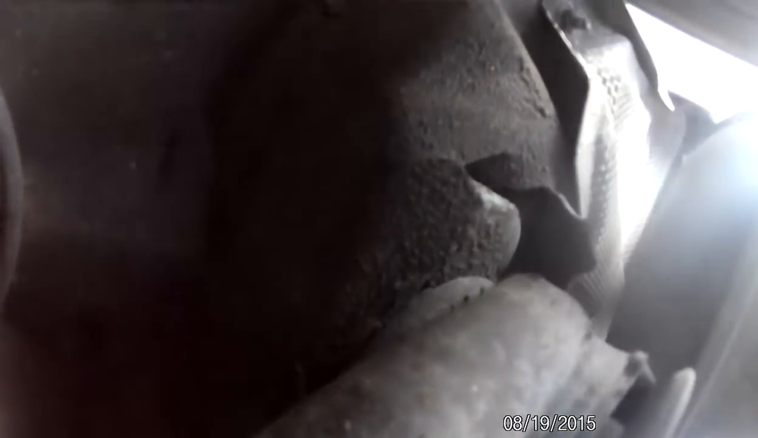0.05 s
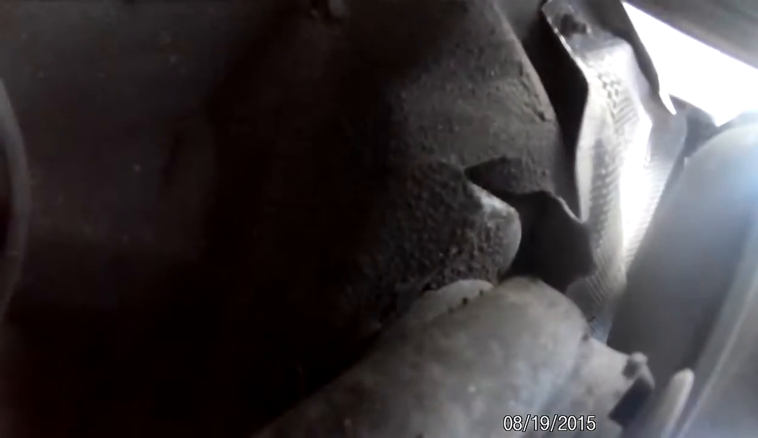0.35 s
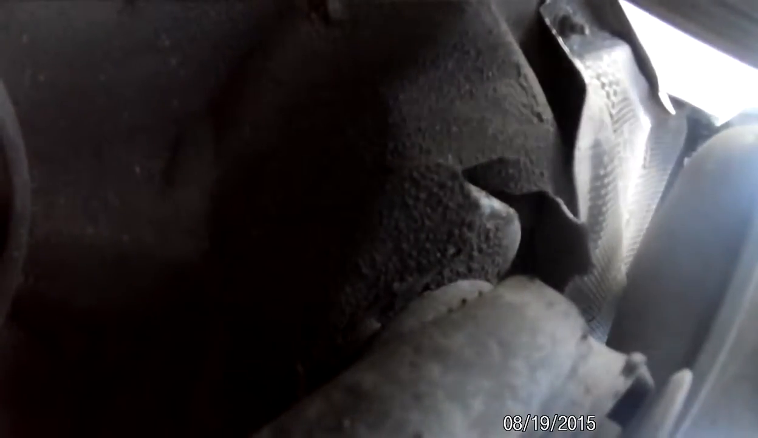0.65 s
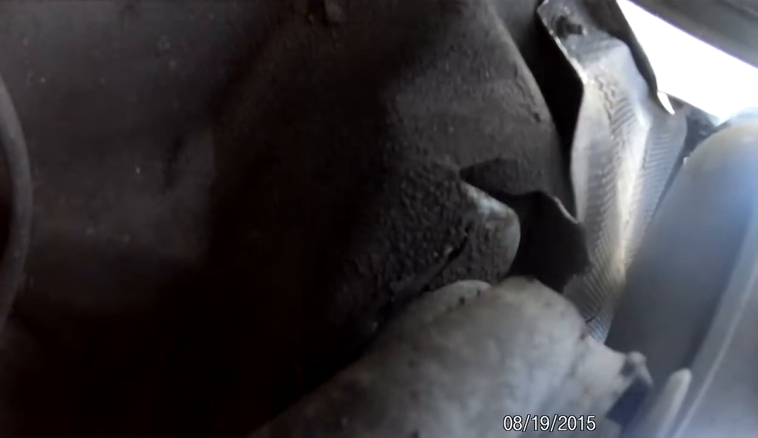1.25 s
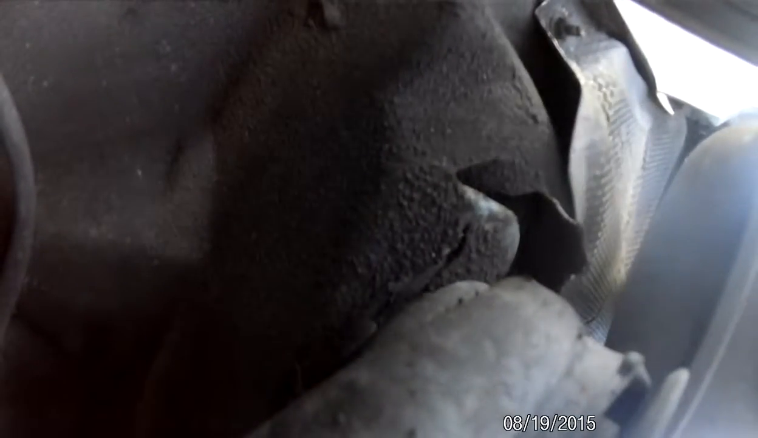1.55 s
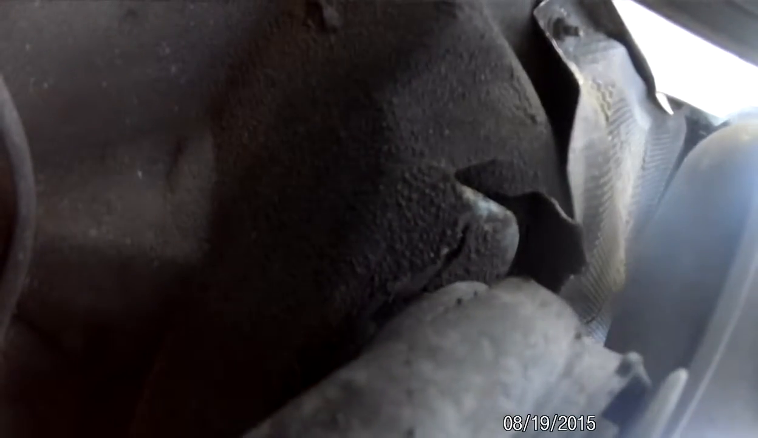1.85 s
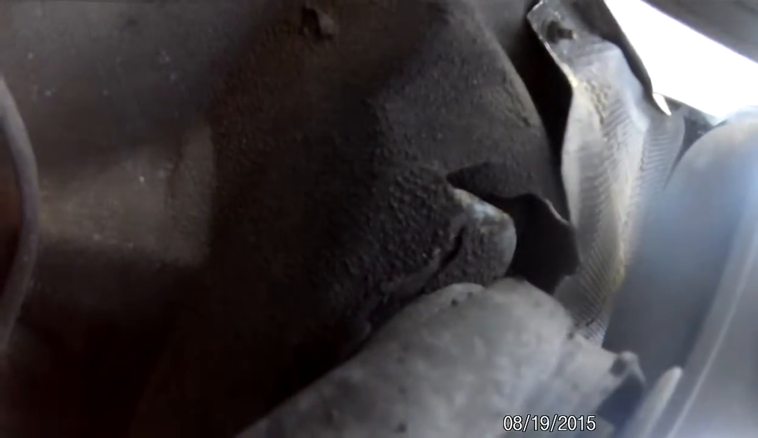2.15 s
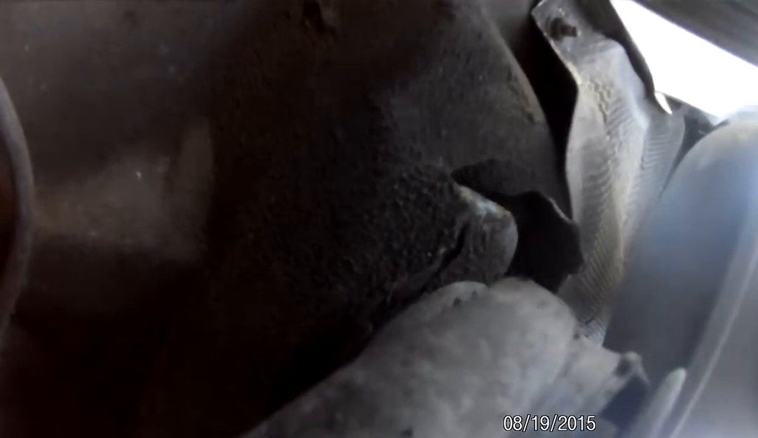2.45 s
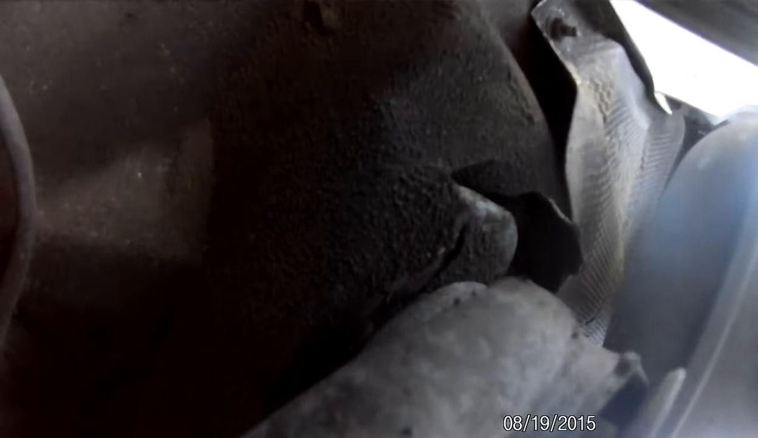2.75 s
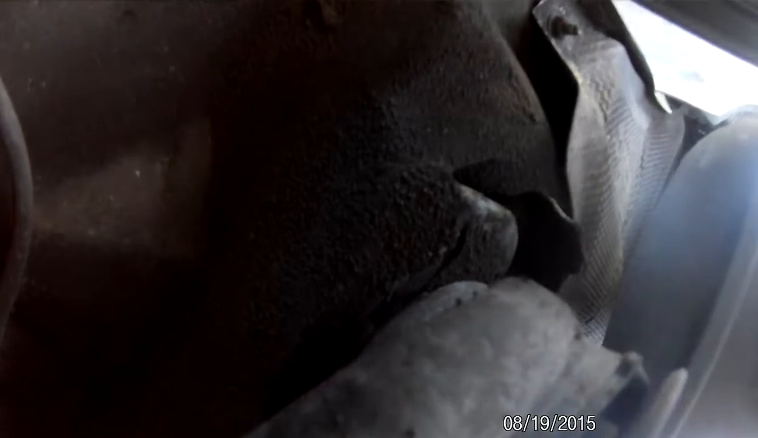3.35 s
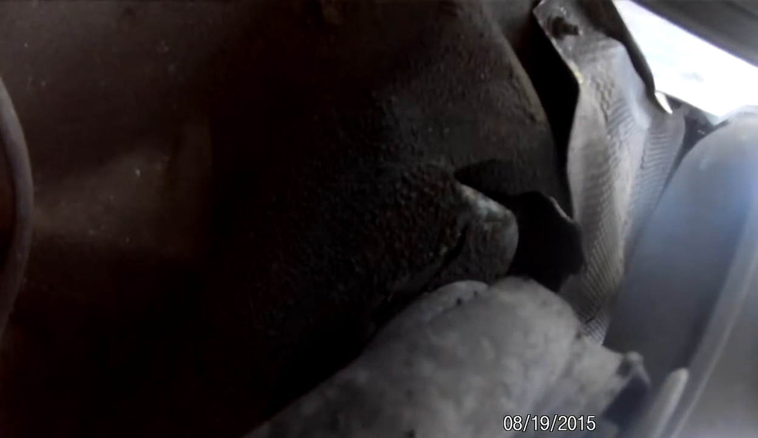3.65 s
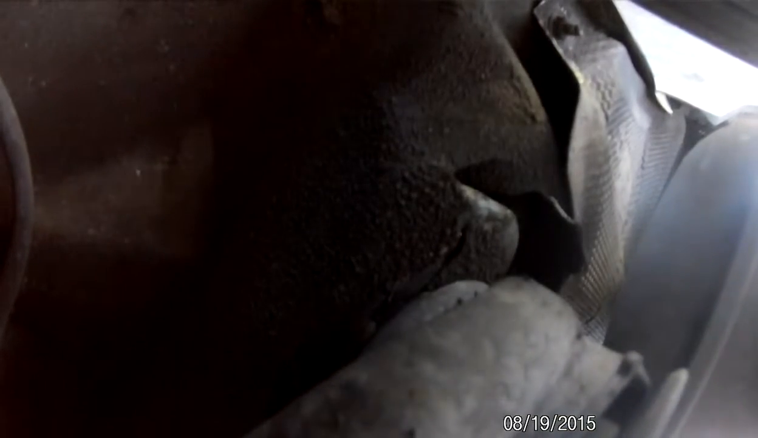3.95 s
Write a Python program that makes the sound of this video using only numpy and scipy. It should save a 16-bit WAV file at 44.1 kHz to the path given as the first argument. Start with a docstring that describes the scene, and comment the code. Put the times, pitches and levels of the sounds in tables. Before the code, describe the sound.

A car's suspension creaks, heard close up from underneath as it rolls slowly. After a brief hiss come short rubbery groans, then dry snaps that quicken into a rasp, then scattered knocks, all over a low engine and road rumble.

```python
"""A bright hiss, cut off abruptly, opens on a close microphone under a slowly moving car.
A dry suspension joint sticks and slips, creaking in single snaps that run together into a rasp.
A second, rubbery joint slips in short groans and knocks that ring the underbody.
Behind them the engine drones, the body booms with the road and a thin hum wavers."""
import sys
import numpy as np
from scipy import signal
from scipy.fft import rfft, irfft, next_fast_len
from scipy.io import wavfile
from scipy.ndimage import map_coordinates

SR = 44100
rng = np.random.default_rng(int(sys.argv[2]) if len(sys.argv) > 2 else 0)


def master(y):
    """Save y as 16-bit WAV."""
    cut = np.clip(np.atleast_2d(y).T, -1, 1)
    pcm = np.round(cut * 32767)  # scale
    wavfile.write(sys.argv[1], SR, pcm.astype(np.int16))


N = 176400


def amp(db):
    """Decibels to gain."""
    return 10 ** (np.asarray(db) / 20)


def unit(x):
    """Scale to rms 1."""
    return x / np.sqrt(np.mean(x ** 2) + 1e-20)


def along(points, hz):
    """Read (Hz, value) points on a log frequency axis."""
    knots_hz, values = np.transpose(points)
    return np.interp(np.log(hz + 1), np.log(knots_hz + 1), values)


def curve(rows):
    """Join (seconds, value) points, one value per sample."""
    return np.interp(np.arange(N) / SR, *np.transpose(rows))


def wobble(rate):
    """A smooth random curve, rate knots a second."""
    return map_coordinates(rng.standard_normal(4096), [np.arange(N) * rate / SR], mode="wrap")


def coloured(x, points):
    """Pass x through a causal filter with the given (Hz, dB) shape."""
    size = 2 * next_fast_len(len(x) // 2 + 4096)
    gain = amp(along(points, np.fft.rfftfreq(size, 1 / SR)))
    cepstrum = irfft(np.log(gain), size)
    cepstrum[1:size // 2] *= 2  # fold to minimum phase
    cepstrum[size // 2 + 1:] = 0
    return irfft(rfft(x, size) * np.exp(rfft(cepstrum)), size)[:len(x)]


def noise(points):
    """Coloured noise of rms 1."""
    return unit(coloured(rng.standard_normal(N), points))


def add(track, start_s, sound):
    """Mix a sound into the track."""
    i = max(round(start_s * SR), 0)
    track[i:i + len(sound)] += sound[:max(N - i, 0)]


# The hiss at the microphone. Each row: frequency in Hz, relative noise density in dB.
HISS_COLOUR = [(900, -7.5), (1500, -1), (1900, -10), (2450, -9), (3200, -24.5), (4300, -2), (5500, -25.5),
               (6500, -19.5), (7900, -39), (9600, -25), (11500, -47)]

def hiss(level_db=-34, end_s=0.2254, fade_s=0.028):
    """A bright hiss that stops abruptly."""
    gate = np.clip((end_s - np.arange(N) / SR) / fade_s, 0, 1)
    return amp(level_db) * gate ** 2 * noise(HISS_COLOUR)


# The crank's speed. Each row: time in seconds, turns per second.
CRANK_SPEED = [(0, 26.0), (1.4, 29.2), (2.5, 30.2), (2.8, 31.3), (3.15, 30.9), (3.62, 27.7), (3.9, 23.5),
               (4, 23.2)]
# The exhaust's resonances. Each row: frequency in Hz, gain in dB.
EXHAUST_RESPONSE = [(26, -13.5), (54, -4.5), (82, 0.5), (110, -35.5), (190, -27.5), (218, 9), (245, 2.5),
                    (275, -30.5), (310, 6), (350, -9.5), (400, -31)]
# The drone from under the car. Each row: time in seconds, relative level in dB.
DRONE_LEVEL = [(.7, -36), (1.3, -39), (2.1, -32.5), (2.7, -46), (3.1, -37), (3.55, -40.5), (3.8, -59.5)]
# The twelfth order, standing out as the engine slows. Each row: time in seconds, level in dB.
WHINE_LEVEL = [(3.52, -48), (3.63, -34), (3.93, -43), (4, -32)]

def engine(drone_db=1.5):
    """Crank orders slide through fixed resonances, each a little unsteady."""
    speed = curve(CRANK_SPEED) * (1 + 0.0023 * wobble(6.8))
    angle = 2 * np.pi * np.cumsum(speed) / SR
    orders = np.zeros(N)
    for order in range(1, 19):
        gain = amp(along(EXHAUST_RESPONSE, order * speed) + 3.5 * wobble(5.1))
        phase = 2 * np.pi * rng.random() + 0.17 * wobble(15)
        orders += gain * np.sin(order * angle + phase)
    whine = amp(curve(WHINE_LEVEL)) * np.sin(12 * angle)
    return amp(curve(DRONE_LEVEL) + drone_db) * unit(orders) + whine


# The body booming overhead. Each row: time in seconds, level in dB.
BOOM_LEVEL = [(.18, -49), (.33, -32), (1.09, -33.5), (1.25, -39.5), (1.7, -31.5), (1.92, -40),
              (2.08, -27.5), (2.3, -47), (2.5, -28.5), (2.68, -43.5), (3.2, -35.5), (3.43, -54),
              (3.84, -27), (4, -29)]
# Rolling noise, close to the road. Each row: frequency in Hz, relative noise density in dB.
ROLLING_COLOUR = [(30, -6), (45, 9), (90, -1), (170, -8), (235, 5.5), (320, 1.5), (400, -15), (700, -14.5),
                  (900, -21.5), (1250, -14.5), (1480, -15), (1750, -21), (2400, -21.5), (2900, -35.5),
                  (4300, -30.5), (5200, -47.5), (6400, -43), (7400, -54.5), (8200, -76)]
# The rolling eases near the end. Each row: time in seconds, level in dB.
ROLLING_LEVEL = [(0, -35), (3.3, -36.5), (3.7, -41)]

def road(boom_hz=52.06):
    """The body booms on one low resonance, under broad rolling noise; both levels waver."""
    resonance = np.sin(2 * np.pi * boom_hz * np.arange(N) / SR + 0.5 * wobble(5))
    rolling = amp(curve(ROLLING_LEVEL) + wobble(25.03)) * noise(ROLLING_COLOUR)
    boom = amp(curve(BOOM_LEVEL) + wobble(7.2)) * unit(resonance)
    return boom + rolling


# A faint hum in the background. Each row: time in seconds, level in dB.
HUM_LEVEL = [(.38, -53.5), (1.1, -55.5), (2.9, -58), (3.28, -51), (3.45, -60)]

def hum(centre_hz=1575, waver=0.012):
    """A thin tone wavers in pitch, smeared by a fast flutter."""
    hz = centre_hz * (1 + waver * wobble(9))
    tone = np.sin(2 * np.pi * np.cumsum(hz) / SR)
    return amp(curve(HUM_LEVEL)) * unit(wobble(70) * tone)


# The dry joint's modes. Each row: frequency in Hz, level in dB, seconds to fall 60 dB.
JOINT_MODES = [(224.6, -8.5, 0.1), (463, -14.5, 0.055), (644, 2.5, 0.017), (966, -5, .025),
               (1187, -0.5, 0.036), (1316, 2.5, 0.023), (1400, -5, 0.027), (1723, -16, 0.042),
               (2388, -18.5, 0.046), (2570, -28, 0.039), (3163, -31.5, 0.079)]

def joint_snap(attack_s=0.0014, scatter_db=1, detune=0.008):
    """One slip rings damped modes of alternating sign, a little different every time."""
    t = np.arange(SR // 6) / SR
    hz, db, t60 = np.transpose(JOINT_MODES)[:, :, None]
    pitch = 1 + detune * rng.standard_normal()
    sign = (-1) ** np.arange(len(hz))[:, None]
    gain = sign * amp(db + scatter_db * rng.standard_normal(hz.shape))
    modes = gain * amp(-60 * t / t60) * np.sin(2 * np.pi * hz * pitch * t)
    return modes.sum(0) * (1 - np.exp(-t / attack_s)) ** 2


# Single snaps close to the microphone. Each row: time in seconds, relative level in dB.
SINGLE_SNAPS = [(.0075, -18), (.0283, -19), (.0419, -16), (.0602, -20), (.0789, -17.5), (1.4373, -16),
                (1.4543, -14.5), (1.4712, -20.5), (1.4952, -13), (1.5311, -14), (1.5665, -16),
                (1.6049, -13), (1.6458, -11), (1.6962, -11), (1.7835, -10), (1.8613, -10.5),
                (1.8962, -16.5), (1.9262, -13), (2.1878, -12), (3.908, -23)]
# Dry grit in a snap. Each row: frequency in Hz, relative noise density in dB.
GRIT_COLOUR = [(200, 5), (1300, 0.5), (1900, -12.5), (2500, -17.5), (3000, -28), (4400, -20.5), (6500, -63)]

def creak(ring_db=-0.5, lead_s=0.001894, give_db=-10.5, give_s=0.00213, grit_db=-23, grit_t60_s=0.12):
    """The dry joint sticks and slips: each time it gives a little, snaps and trails grit."""
    slips = list(SINGLE_SNAPS) + rasp_slips()
    ringing, grit_power = np.zeros(N), np.zeros(N)
    age = np.arange(SR // 6) / SR
    grit = noise(GRIT_COLOUR)
    for at, db in slips:
        snap = amp(db + ring_db) * joint_snap()
        snap_at = at - lead_s  # the ring starts just ahead of the grit
        add(ringing, snap_at, snap)
        add(ringing, snap_at - give_s * rng.uniform(0.73, 1.343), amp(give_db) * snap)
        add(grit_power, at, amp(db + grit_db - 60 * age / grit_t60_s) ** 2)
    return ringing + np.sqrt(grit_power) * grit


# The underbody's panel modes, just above the microphone.
# Each row: frequency in Hz, lift over the direct sound in dB, seconds to fall 60 dB.
PANEL_MODES = [(461, 18, .17), (636, 2.5, 0.037), (855, -5.5, 0.056), (980, -1, 0.16), (1236, -2.5, 0.27),
               (1590, -7, 0.047)]

def underbody(t, tail_db=-1.5, tail_t60_s=0.12):
    """Answer to one slip: the direct push, panel modes and a diffuse tail off floor pan and road."""
    hz, lift_db, t60 = np.transpose(PANEL_MODES)[:, :, None]
    loss = np.log(1000) / t60
    modes = amp(lift_db) * 2 * loss / SR * np.exp(-loss * t) * np.cos(2 * np.pi * hz * t)
    tail = rng.standard_normal(len(t)) * amp(-60 * t / tail_t60_s)
    return (t == 0) + modes.sum(0) + amp(tail_db) * tail / np.linalg.norm(tail)


# The rubber joint at close range: fast slips squawk, slow ones knock.
# Each row: start in seconds, length in seconds, level in dB, opening slip rate in Hz.
RUBBER_GROANS = [(.266, .013, -20, 500), (0.2798, 0.025, -19, 399.7), (0.372, 0.019, -29, 412),
                 (0.627, 0.019, -26.5, 419), (2.233, .024, -37, 232), (2.277, 0.017, -22.5, 506),
                 (2.297, 0.0071, -20.5, 431.6), (2.3335, 0.03, -23, 484), (2.3489, .014, -19.5, 422.6),
                 (2.385, 0.02, -20.5, 211.7), (2.449, 0.031, -18, 216.6), (2.496, 0.01, -24.5, 212.8),
                 (2.8435, 0.0098, -27.5, 212), (2.904, 0.012, -23, 213), (3.4179, .018, -20.5, 216.4),
                 (3.506, 0.012, -38, 404), (3.571, 0.016, -22.5, 212.6), (3.661, 0.01, -41.5, 407),
                 (3.971, 0.017, -23, 210.7)]
# The colour of one slip. Each row: frequency in Hz, gain in dB.
SLIP_COLOUR = [(100, -6), (450, -7.5), (1000, 0.5), (1300, 6), (1580, -15.5), (1750, -21.5), (1950, -18.5),
               (3000, -38.5), (4300, -38.5), (8500, -70.5)]

def groans(jitter=0.025, scatter_db=1.5, scuff_db=-11, fade_db=6.5, release_s=0.0013):
    """A rubber joint slips at a sagging rate and rings the underbody; strong and weak slips alternate."""
    out, t, slip = np.zeros(N), np.arange(SR // 5) / SR, np.arange(24)
    for start, length, db, start_hz in RUBBER_GROANS:
        rate = np.interp(slip / start_hz, [0, length], [start_hz, 0.955 * start_hz])
        period = (1 + jitter * rng.standard_normal(len(slip))) / rate
        strength = amp(scatter_db * rng.standard_normal(len(slip))) * (1 - 0.34 * (slip % 2))
        onsets = np.round((np.cumsum(period) - period) * SR).astype(int)
        pulses = np.bincount(onsets, strength, len(t))
        scuff = amp(scuff_db) * np.sqrt(start_hz / SR) * rng.standard_normal(len(t))
        grip = amp(-fade_db * t / length) * np.exp(-np.maximum(t - length, 0) / release_s)
        ringing = signal.fftconvolve((pulses + scuff) * grip, underbody(t))[:len(t)]
        groan = coloured(ringing, SLIP_COLOUR)
        power = np.sum(groan ** 2) / ((length + release_s) * SR)
        add(out, start, amp(db) * groan / np.sqrt(power))
    return out


# The dry joint's rasp, midway. Each row: time in seconds, slips per second, relative level in dB.
RASP_COURSE = [(1.9474, 82.3, -14.5), (1.98, 110, -14.5), (2.043, 165, -13.5), (2.072, 132, -15),
               (2.136, 110, -13.5), (2.163, 125, -13)]

def rasp_slips(jitter_s=0.00029, scatter_db=0.8):
    """Times and levels of slips so close that their snaps run together."""
    knots_s, rate, level_db = np.transpose(RASP_COURSE)
    t = np.arange(knots_s[0], knots_s[-1], 1 / SR)
    count = np.cumsum(np.interp(t, knots_s, rate)) / SR
    times = np.interp(np.arange(int(count[-1]) + 1), count, t)
    late, louder = rng.standard_normal((64, 2))[:len(times)].T
    levels = np.interp(times, knots_s, level_db) + scatter_db * louder
    return list(zip(times + jitter_s * late, levels))


def scene():
    """All sources reach one close microphone under the car."""
    background = engine() + road() + hum()
    return (background + hiss() + groans() + creak())[None]


def record(dry, top_hz=11700):
    """The recorder cuts off steeply above its band limit."""
    return signal.sosfilt(signal.ellip(10, 0.1, 90, top_hz, fs=SR, output="sos"), dry)


dry = scene()
out = record(dry)
master(out)
```